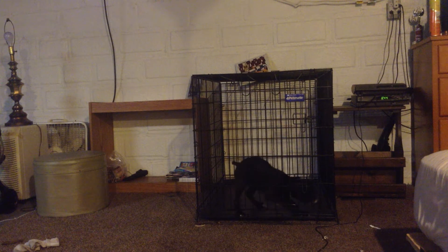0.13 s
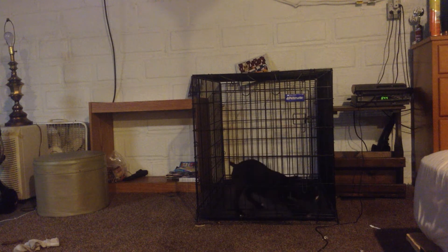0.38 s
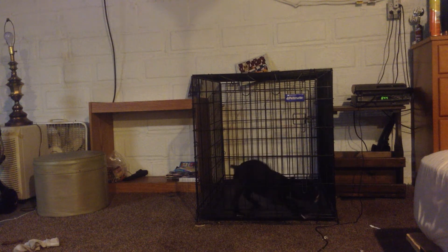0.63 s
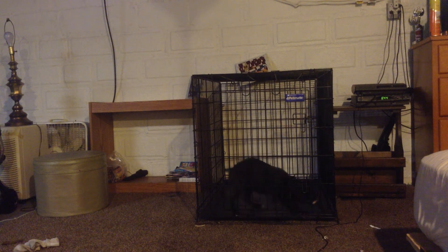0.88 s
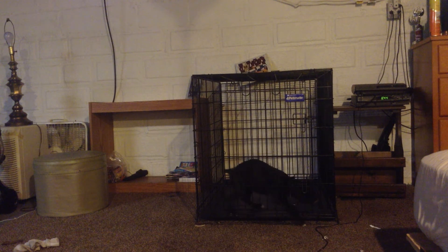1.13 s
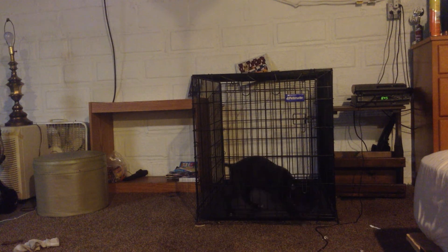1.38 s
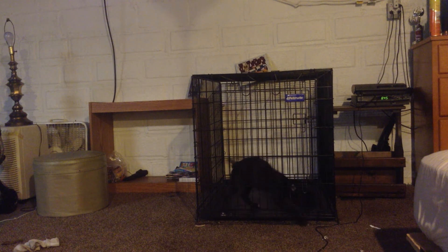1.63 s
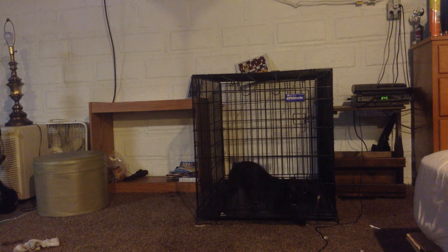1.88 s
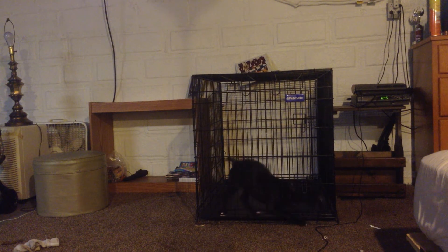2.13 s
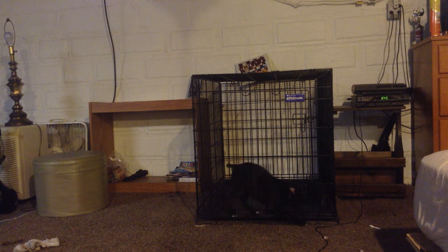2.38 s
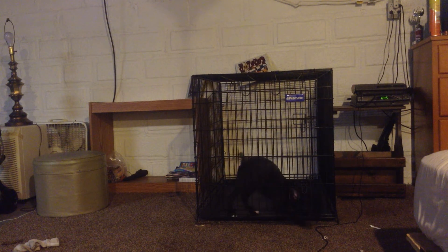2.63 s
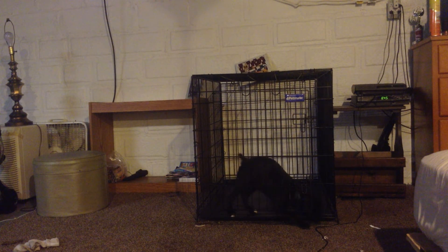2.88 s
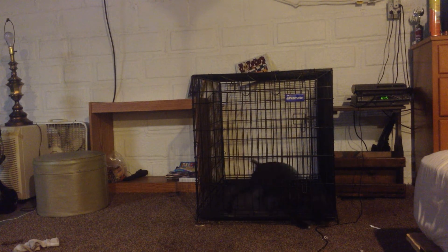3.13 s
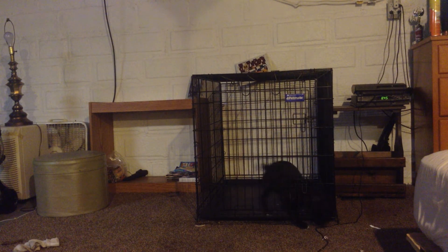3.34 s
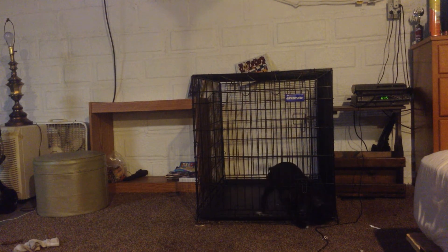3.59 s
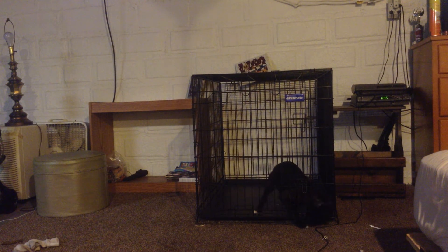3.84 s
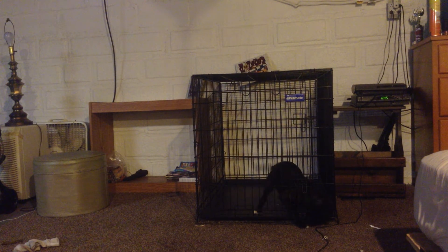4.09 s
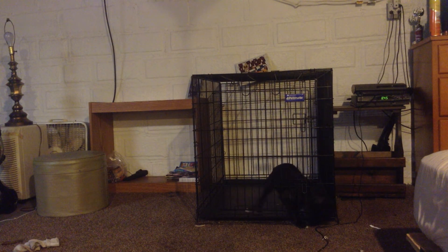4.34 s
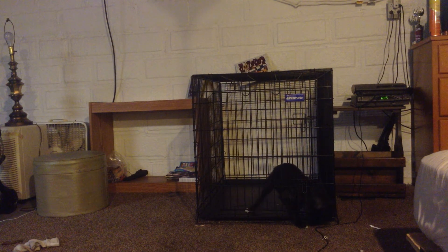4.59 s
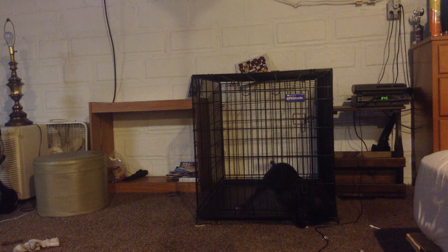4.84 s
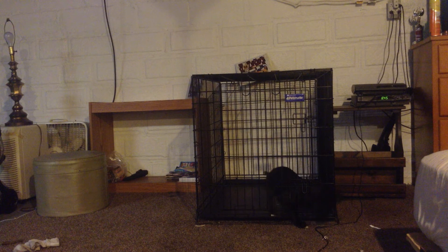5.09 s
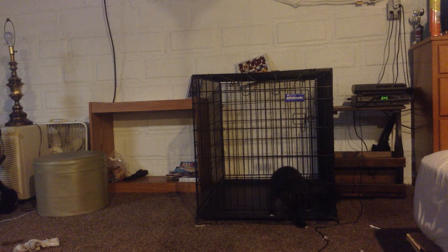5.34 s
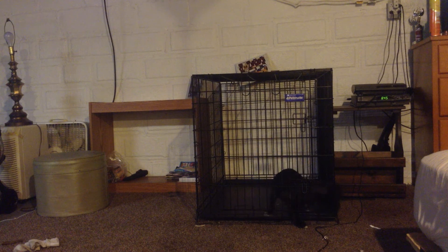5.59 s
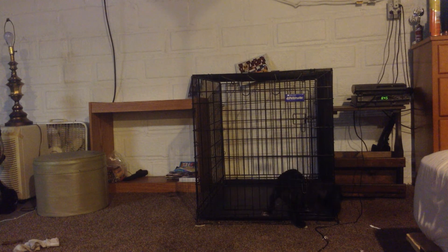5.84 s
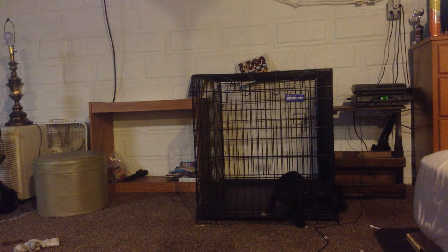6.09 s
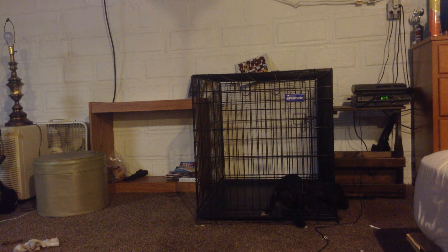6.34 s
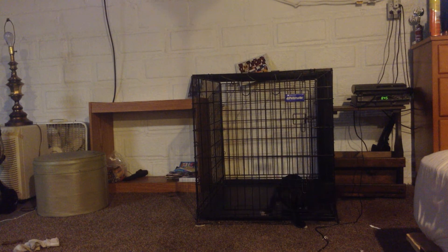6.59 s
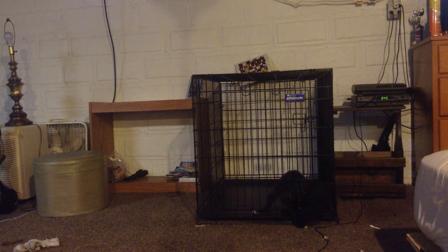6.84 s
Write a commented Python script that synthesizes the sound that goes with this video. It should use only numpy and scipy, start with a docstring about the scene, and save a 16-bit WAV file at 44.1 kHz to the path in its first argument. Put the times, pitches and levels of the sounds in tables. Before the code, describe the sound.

A dog's claws dig and scratch in quick bursts on a hollow plastic crate tray, with thumps, sharp ticks and faint sniffs indoors.

```python
"""A dog digs and shuffles on the plastic tray of a wire crate, a few metres from the microphone.
Its claws catch and slip in dense tiny clicks, filtered into scratching, while the same kind of clicks
drum the tray's resonances under the paw. Claw tips tick and snag as short noise bursts; sniffs are
narrow bands of noise. The carpeted room adds a diffuse tail, over steady hiss and a mains hum."""
import sys
import numpy as np
from scipy import signal
from scipy.fft import rfft, irfft, next_fast_len
from scipy.io import wavfile
from scipy.ndimage import uniform_filter1d

SR = 44100
rng = np.random.default_rng(int(sys.argv[2]) if len(sys.argv) > 2 else 0)


def waveform_to_disk(signal):
    """Save audio, clipped to [-1, 1], as 16-bit WAV at the path in sys.argv[1]."""
    frames = np.transpose(np.atleast_2d(signal))
    scaled = np.clip(frames, -1, 1) * 32767
    samples = np.round(scaled).astype(np.int16)
    wavfile.write(sys.argv[1], SR, samples)


def volts_from_decibels(level):
    """Turn decibel levels (scalar or array-like) into linear amplitude factors."""
    exponent = np.asarray(level, float) / 20
    return 10 ** exponent


N = 306936
T = np.arange(N) / SR

# bright spectrum of claw snaps and grit: (frequency [Hz], relative level per Hz [dB])
SNAP_SPECTRUM = [(500, -50), (3500, -23), (7500, -2), (11000, -4.5), (16000, -15)]


def level(x, db):
    """Scale to an rms level."""
    return x * volts_from_decibels(db) / np.sqrt(np.mean(x ** 2))


def colour(x, points):
    """Shape by (Hz, dB) points, joined on a log axis."""
    hz, db = np.transpose(points)
    size = next_fast_len(len(x))
    axis = np.log(np.fft.rfftfreq(size, 1 / SR) + 1)
    return irfft(rfft(x, size) * volts_from_decibels(np.interp(axis, np.log(hz), db)), size)[:len(x)]


def ring(x, hz, width_hz):
    """One resonance, gain 1 at its centre."""
    return signal.lfilter(*signal.iirpeak(min(hz, .45 * SR), hz / width_hz, SR), x)


def decay(t, t60_s):
    """Exponential fade, 60 dB down after t60_s."""
    return np.exp(-np.log(1000) * t / t60_s)


def walk(rate):
    """Random levels held 1 / rate s and slewed; spread 1."""
    hold = int(SR / rate)
    steps = np.repeat(rng.standard_normal(N // hold + 1), hold)
    w = uniform_filter1d(steps, hold)[:N]
    return w / w.std()


def slips(spread_db):
    """Stick-slip: a tiny click each sample, a few much larger than the rest; rms 1."""
    size_db = spread_db * np.minimum(rng.exponential(1, N), 3.5)
    return level(rng.standard_normal(N) * volts_from_decibels(size_db), 0)


def background():
    """Steady hiss that wavers a little, and mains hum."""
    # hiss spectrum: (frequency [Hz], relative level per Hz [dB])
    hiss_spectrum = [(35, -25), (60, -14), (94, -15), (139, 0), (168, -3), (363, -4), (480, -7),
                     (767, -5.5), (1340, -14), (13300, -22), (16000, -66)]
    # hum partials: (frequency [Hz], rms level before a 2 dB random waver [dB])
    hum_partials = [(120, -73.5), (240, -70.5), (360, -67.5)]
    hiss_db, hiss_waver_db = -61, 0.65
    hiss = level(colour(rng.standard_normal(N), hiss_spectrum), hiss_db) * volts_from_decibels(hiss_waver_db * walk(7.8))
    hum = 0
    for k, (hz, db) in enumerate(hum_partials):
        hum = hum + np.sqrt(2) * volts_from_decibels(db + 2 * walk(8)) * np.sin(2 * np.pi * hz * T + k)
    return hiss + hum


def pressure():
    """Each stroke lands, presses in, drags and lifts; gains for tray, claws and fine treble, summed in power."""
    # paw strokes: (start [s], press [s], drag [s], relative tray drumming [dB], relative claw scratch [dB])
    paw_strokes = [ (0, 0.00074, 0.072, -36, -39.5), (0.224, 0.004, 0.015, -40.5, -52),
                   (0.284, 0.015, 0.042, -40, -54), (.34, 0.079, 0.015, -28.5, -32.5),
                   (0.449, 0.026, 0.024, -32, -31.5), (.53, 0.0043, 0.0075, -32, -48),
                   (.612, 0.089, 0.0055, -35, -44), (.66, 0.023, 0.11, -41, -42),
                   (.77, 0.0072, 0.016, -38, -34), (.82, 0.0073, .035, -34, -38),
                   (.9, 0.018, 0.053, -34.5, -40), (.96, 0.024, 0.0083, -30.5, -49),
                   (1.038, 0.0045, 0.029, -29, -35), (1.069, 0.026, 0.0096, -22.5, -24),
                   (1.2, 0.078, 0.019, -32, -41), (1.343, 0.092, 0.076, -20.5, -25),
                   (1.543, 0.022, 0.025, -23, -20), (1.66, 0.021, 0.026, -35.5, -47),
                   (1.742, 0.006, 0.069, -34, -42), (1.835, 0.084, 0.027, -25, -34),
                   (2.006, 0.013, 0.012, -31, -29.5), (2.117, 0.0046, 0.07, -39.5, -36.5),
                   (2.165, 0.021, 0.03, -38, -35), (2.268, 0.0053, 0.038, -27.5, -29.5),
                   (2.34, 0.012, 0.11, -40.5, -64), (2.567, 0.077, 0.043, -28.5, -29),
                   (2.927, 0.018, 0.027, -40, -75), (3.003, 0.0023, 0.096, -27.5, -24.5),
                   (3.17, .005, 0.053, -35, -32.5), (3.223, 0.0048, 0.053, -30, -27.5),
                   (3.329, 0.092, 0.011, -22.5, -18.5), (3.503, 0.042, 0.05, -20.5, -19.5),
                   (3.874, 0.017, 0.009, -47, -55), (3.98, 0.037, 0.025, -45, -59),
                   (4.049, 0.016, 0.016, -31, -34.5), (4.211, 0.0078, 0.0046, -42, -51),
                   (4.253, 0.036, 0.033, -25, -25.5), (4.46, 0.011, 0.013, -40, -58),
                   (4.539, 0.037, 0.074, -19, -19), (4.71, .01, 0.033, -33, -29.5),
                   (4.853, 0.0071, 0.011, -43.5, -28.5), (4.928, 0.0032, 0.022, -31.5, -35),
                   (4.998, 0.012, 0.036, -30.5, -51), (5.131, 0.0036, 0.02, -30, -36.5),
                   (5.247, 0.0061, 0.059, -35.5, -34.5), (5.41, 0.0068, 0.013, -40, -39.5),
                   (5.48, 0.016, 0.054, -37.5, -27.5), (5.503, 0.013, 0.058, -30.5, -29.5),
                   (5.66, 0.035, 0.042, -47, -67), (5.733, 0.0021, 0.0051, -34, -59),
                   (5.78, 0.057, 0.019, -30, -40), (5.99, 0.0034, 0.005, -35, -54),
                   (6.575, 0.012, .03, -32.5, -50), (6.614, 0.0094, 0.027, -27.5, -34),
                   (6.734, 0.014, 0.044, -32.5, -34.5), (6.799, 0.0075, 0.012, -33, -33),
                   (6.9, .01, .05, -50, -49)]
    # level at touch, relative to full pressure: (tray [dB], claws [dB], fine treble [dB])
    touch_levels = (-15, -15.5, -11.5)
    # fade as the paw lifts: (tray [dB/s], claws [dB/s], fine treble [dB/s])
    lift_rates = (-170, -230, -330)
    land_s = 0.0005  # time to make contact
    fine_db = -4.5  # fine treble relative to the scratch
    dulling_db_per_s = -24  # the claw tip bites less as the stroke drags on
    power = np.zeros((3, N))
    for start_s, press_s, drag_s, drum_db, claw_db in paw_strokes:
        i = int(start_s * SR)
        t = T[:min(SR // 2, N - i)]
        contact = np.clip(t / land_s, 0, 1) ** 2
        unpressed = np.clip(1 - t / press_s, 0, 1) ** 1.54
        lifted_s = np.clip(t - press_s - drag_s, 0, None)
        full_db = [drum_db, claw_db, claw_db + fine_db + dulling_db_per_s * t]
        for layer, top_db, touch_db, lift in zip(power, full_db, touch_levels, lift_rates):
            layer[i:i + len(t)] += contact * volts_from_decibels(top_db + touch_db * unpressed + lift * lifted_s) ** 2
    return np.sqrt(power)


def knocks():
    """Paw pads knock the tray: a quick rise, then an exponential fade."""
    # pad knocks: (time [s], relative level [dB], fade by a factor e [s])
    pad_knocks = [(0.405, -16, 0.0095), (0.494, -21, 0.013), (0.545, -34, 0.0049), (0.983, -28, 0.014),
                  (1.93, -19, 0.0083), (1.958, -24, 0.0054), (2.282, -20, 0.0068), (5.028, -19.5, 0.014),
                  (5.058, -22, 0.011), (5.692, -30, 0.012), (5.742, -35, 0.008), (5.807, -27, 0.014),
                  (5.86, -20, 0.017), (5.905, -38, 0.01), (5.999, -29, 0.007), (6.202, -41, 0.0077),
                  (6.621, -27, 0.012), (6.714, -26, 0.027), (6.769, -21, 0.0083)]
    knock = 0
    for s, db, fade_s in pad_knocks:
        knock = knock + volts_from_decibels(db) * np.clip((T - s) / 0.001, 0, 1) * np.exp(-np.abs(T - s) / fade_s)
    return knock


def tray_drumming(drum, push, bass_db, top_db):
    """The tray's resonances, driven by slips under the paw's weight and by knocking pads."""
    # tray resonances: (frequency [Hz], width [Hz], relative level [dB])
    resonances = [(185, 39, -19), (247.3, 25.7, -9), (327, 48.3, -1), (398.5, 92, -1), (481, 71, -0.5),
                  (565, 50.5, -1.5), (613, 39.7, 0.5), (697, 85, -1.5), (795, 82, 0), (904, 120, -0.5),
                  (1063, 170, -3), (1230, 240, -7.5), (1450, 630, -10.5), (1880, 750, -12),
                  (3030, 3700, -22)]
    bass_hz, top_hz = 480, 1300  # the tray's bass lies below the first, its top above the second
    broad_hz = 350  # width
    reach_db = 1.3  # spread of a narrow resonance's level as the paw moves
    knock_hz, knock_octaves = 850, 0.62  # a pad wakes mostly the resonances around here
    knock = knocks()
    struck, free = 0, 0
    for k, (hz, width_hz, db) in enumerate(resonances):
        # as the paw moves over the tray it wakes each resonance more or less, the broad ones more evenly
        reach = db + reach_db * min(1, broad_hz / 2 / width_hz) * walk(20)
        shade = bass_db / (1 + (hz / bass_hz) ** 4) + top_db / (1 + (top_hz / hz) ** 4)
        gain = (-1) ** k * volts_from_decibels(reach + shade)
        # each broad top resonance answers to the slips shifted in time
        slip = np.roll(push, k * SR // 10) if width_hz > broad_hz else push
        free = free + gain * ring(slip, hz, width_hz)
        pad = volts_from_decibels(-3.5) * np.exp(-(np.log2(hz / knock_hz) / knock_octaves) ** 2)
        struck = struck + ring(gain * (drum + pad * knock) * slip, hz, width_hz)
    # the tray is too small to radiate deep bass
    return colour(struck / free.std(), [(70, -24), (140, -5.5), (220, -0.5)])


def grit():
    """Grit under the claws cracks in lone bright clicks, about 220 a second."""
    cracks = (rng.random(N) < 220 / SR) * rng.standard_normal(N)
    crack = rng.standard_normal(256) * np.exp(-T[:256] / 0.0006)
    return level(colour(signal.fftconvolve(cracks, crack)[:N], SNAP_SPECTRUM), -13)


def claw_scratch(scratch, fine, stutter_db, top_db):
    """Claws rub the plastic in stick-slip noise; each scrapes its own patch of the treble."""
    # spectrum of the rub: (frequency [Hz], relative level per Hz [dB])
    rub_spectrum = [(500, -50), (1200, -9), (1560, -8), (2270, -10), (4220, -5), (14000, -23), (15500, -35),
                    (16000, -49)]
    patch_hz, patchy_db = 1300 * 1.5 ** np.arange(7), 0.7
    # brief catches of a claw, about 90 a second
    catches = (rng.random(N) < 90 / SR) * 0.35 * np.minimum(rng.exponential(1, N), 2.5)
    catch_shape = np.exp(-np.abs(T[:2001] - T[1000]) / 0.0015)
    skids = 1 + np.tanh(signal.fftconvolve(catches, catch_shape, "same"))
    rub = colour(slips(5.2) * volts_from_decibels(stutter_db) * skids, rub_spectrum)
    patches = []
    for k, hz in enumerate(patch_hz):
        gain = (-1) ** k * volts_from_decibels(patchy_db * walk(25) + top_db / (1 + (hz / 2400) ** 4))
        patches.append(gain * ring(rub, hz, 0.6 * hz))
    coarse = level(sum(patches[:4]) + 0.37 * ring(rub, 3880, 920), -3.5)
    # a sharper claw tip adds the finest treble
    finest = level(sum(patches[4:]), -3)
    return scratch * coarse + fine * (finest + grit())


def strokes():
    """Claws stutter over the plastic; the tray's resonances drum under the paw."""
    # slow change of colour: (time [s], tray's bass [dB], tray's top [dB], fine treble [dB])
    shading = [(0, 4, 3, 6), (.3, -2.5, 2, -20), (.5, 2, 2, 5), (.75, -0.5, 1, 4.5), (1.0, -3.5, -6.5, -6),
               (1.12, -7, 4, 4.5), (1.3, -4.5, -9.5, 2), (1.5, -4.5, 0, 0.5), (1.75, 0, 1.5, 5),
               (1.95, -1.5, -3, 1.5), (2.3, 1.5, -1.5, 2), (2.7, -5, -0.5, -2), (3.1, -2.5, 0, 2.5),
               (3.4, -3, -7, 1.5), (3.6, 0, 0, 0.5), (3.9, 1, -2.5, 2), (4.1, 1.5, 1.5, -4),
               (4.3, -1.5, -1.5, 3), (4.6, -5.5, -3.5, 2.5), (5.05, 4, -4.5, 3.5), (5.3, 2.5, 1.5, 1),
               (5.55, -7.5, -0.5, 2.5), (5.85, -10, -7.5, -4), (6.05, -14, -9, 3), (6.62, -3, -4.5, 1),
               (6.77, -2.5, -4, -1.5), (6.85, -1.5, -2.5, 2)]
    drum, scratch, fine = pressure()
    at, *shades = np.transpose(shading)
    bass_db, top_db, fine_db = [np.interp(T, at, shade) for shade in shades]
    # several claws catch and let go, unevenly, in both layers at once
    stutter_db = 0.67 * walk(27) + 0.26 * walk(120)
    push = slips(3.77) * volts_from_decibels(0.12 * stutter_db + 1.91 * walk(60))
    tray = tray_drumming(drum, push, bass_db, top_db)
    return tray + claw_scratch(scratch, fine * volts_from_decibels(fine_db), stutter_db, top_db)


def room(x):
    """Diffuse tail: each octave of noise dies at its own rate."""
    # reverberation of the room: (frequency [Hz], time to fall 60 dB [s])
    room_fades = [(250, 0.45), (1000, 0.51), (4000, 0.33), (12000, 0.34)]
    t = np.arange(SR // 2) / SR
    hz, t60_s = np.transpose(room_fades)
    tail = 0
    for centre in 125 * 2. ** np.arange(8):
        fade = decay(t, np.interp(np.log(centre), np.log(hz), t60_s))
        tail = tail + fade * ring(rng.standard_normal(len(t)), centre, 0.5 * centre)
    tail = tail * np.clip(t / 0.0032, 0, 1)
    return signal.fftconvolve(x, tail / np.sqrt(np.sum(tail ** 2)))[:N]


def ticks():
    """A claw lands and skids off; part of it rings in a narrow band, part hisses in the fine treble."""
    # claw tips landing: (time [s], level before a 10 dB cut [dB],
    # peak of the fine treble relative to the ringing band, before an 8.5 dB lift [dB])
    landings = [(0.0388, -18.5, -9), (0.157, -39, 2.5), (0.283, -27, -3.5), (0.332, -23, -8),
                (0.6125, -26, -10), (0.655, -20.5, -10), (0.7708, -15, -17), (0.778, -18, -20),
                (0.8206, -21.5, -3.5), (0.8452, -20, -6), (1.044, -17, -6.5), (1.0574, -24, 4.5),
                (1.265, -19.5, -29), (1.345, -22, -21), (1.4205, -26, 0), (1.5538, -22, -5),
                (1.7394, -20, -4), (1.747, -11.5, -14), (1.784, -19, -11), (1.8505, -15.5, -17),
                (2.0182, -31, -15), (2.118, -19.5, -24), (2.165, -35, -5), (2.284, -24, -0.5),
                (2.361, -17.5, -26), (2.5707, -22, -9), (3.0122, -12.5, -32), (3.04, -21, -2),
                (3.079, -15, -8), (3.09, -6, -10), (3.1745, -22.5, -2), (3.227, -11.5, -30),
                (3.262, -20.5, 0), (3.272, -25, 6), (3.291, -23, 4), (3.302, -13.5, -4), (3.531, -18, 5),
                (3.877, -38, 1.5), (4.0766, -16, -35), (4.2115, -14.5, -10.5), (4.2632, -39, -15),
                (4.4746, -25.5, -30), (4.541, -15, -31), (4.6332, -7.5, -6.5), (4.71, -26, 1),
                (4.726, -20, -3), (4.741, -21, 0), (4.85, -18.5, -10), (4.8577, -16, -8), (4.935, -12, -13),
                (4.9587, -13.5, -7.5), (5.1334, -17, -22), (5.254, -10.5, -11.5), (5.322, -15.5, -20),
                (5.4107, -26, -1), (5.4786, -17.5, -2), (5.739, -21.5, -6), (5.794, -22.5, -20),
                (5.814, -23, -11), (5.834, -15.5, -16), (5.855, -15, -11), (5.994, -24.5, -9),
                (6.1644, -42, -34), (6.241, -44, -27), (6.58, -32, -3), (6.635, -28, -3), (6.642, -29, -3),
                (6.742, -34, -14), (6.757, -32, -3), (6.8, -30, 2)]
    burst_t60_s = 0.15
    snap_t60_s, skid_t60_s, skid_db = 0.018, 0.14, -9  # further fades of the fine treble: snap, weaker skid
    size = 8192
    out = np.zeros(N + size)
    t = np.arange(size) / SR
    snap_and_skid = decay(t, snap_t60_s) + volts_from_decibels(skid_db) * decay(t, skid_t60_s)
    noises = rng.standard_normal((len(landings), size))
    for (s, peak_db, fine_db), noise in zip(landings, noises):
        burst = noise * decay(t, burst_t60_s) * np.clip(t / 0.001, 0, 1)
        body = ring(burst, 4080, 1630)
        fine = colour(burst * snap_and_skid, SNAP_SPECTRUM)
        tick = body / np.abs(body).max() + volts_from_decibels(fine_db + 8.5) * fine / np.abs(fine).max()
        i = int(s * SR)
        out[i:i + size] += volts_from_decibels(peak_db - 10) * tick
    return out[:N]


def nicks():
    """A claw snags for an instant in mid-stroke: a short burst in a broad band."""
    # claw snags: (time [s], peak level before a 9.5 dB cut [dB], centre of the band [Hz])
    snags = [(0.2349, -36, 2070), (0.349, -19, 4770), (0.377, -31, 4790), (0.4, -12, 2240),
             (0.462, -11.5, 4970), (0.4795, -12, 4900), (0.5365, -16, 3780), (0.548, -33, 2020),
             (0.6302, -21, 3440), (0.6906, -20, 2330), (0.9163, -26, 3680), (0.964, -19, 4000),
             (1.0864, -30, 2090), (1.293, -20, 2490), (1.3578, -15, 3900), (1.5618, -15, 3620),
             (1.913, -25, 4000), (2.125, -21, 3850), (2.604, -15.5, 4300), (3.3874, -12, 4170),
             (5.127, -25, 4410), (5.1794, -30, 3020), (5.1974, -26, 4230), (5.3225, -14, 4010),
             (5.5196, -10.5, 3690), (6.2026, -40, 1900), (6.616, -20, 2060), (6.812, -26, 2070),
             (6.8274, -33, 4020)]
    size = 2048
    out = np.zeros(N + size)
    t = np.arange(size) / SR
    noises = rng.standard_normal((len(snags), size))
    for (s, peak_db, hz), noise in zip(snags, noises):
        burst = noise * decay(t, 0.058) * np.clip(t / 0.0008, 0, 1)
        body = ring(burst, hz, 0.37 * hz) + 0.078 * burst
        i = int(s * SR)
        out[i:i + size] += volts_from_decibels(peak_db - 9.5) * body / np.abs(body).max()
    return out[:N]


def sniffs():
    """Air whistles through the nostrils, high and narrow, with a weaker band about an octave below."""
    # sniffs: (start [s], length [s], rms level at the height of the sniff [dB])
    breaths = [(2.52, 0.1, -54.5), (2.872, 0.12, -56), (6.348, 0.19, -64)]
    air = rng.standard_normal(N)
    high = ring(ring(air, 9300, 1900), 9300, 1900)
    nose = level(high + 0.66 * ring(air, 4500, 780), 0)
    shape = 0
    for s, length_s, db in breaths:
        swell = np.sin(np.pi * np.clip((T - s) / length_s, 0, 1)).clip(0)
        shape = shape + volts_from_decibels(db) * np.sqrt(swell)
    return nose * shape


def scene():
    """Dog and tray with their room tail, over the background."""
    dog = strokes() + ticks() + nicks() + sniffs()
    # the echoes change as the paws shift about the crate: a blend of two tails
    place = 0.7 + 0.86 * walk(5)
    echoes = room(dog * np.cos(place)) + room(dog * np.sin(place))
    return (dog + volts_from_decibels(-10) * echoes + background())[None]


def band_limit(x):
    """A steep low-pass at the top of the band."""
    return signal.sosfilt(signal.butter(12, 16520, fs=SR, output="sos"), x)


def record(dry):
    """A small microphone that drops the deep bass and the very top."""
    low_hz, top_hz = 100, 15350
    thin = signal.sosfilt(signal.butter(2, low_hz, "high", fs=SR, output="sos"), dry)
    thin = signal.sosfilt(signal.ellip(6, .5, 30, top_hz, fs=SR, output="sos"), thin)
    return band_limit(thin)


dry = scene()
out = record(dry)
waveform_to_disk(out)
```